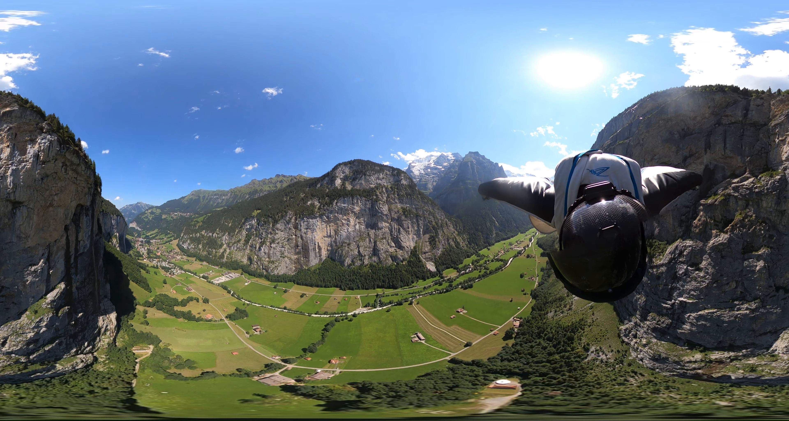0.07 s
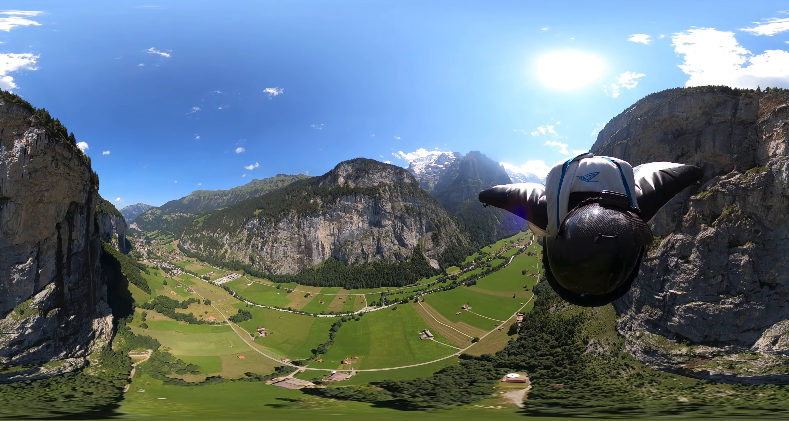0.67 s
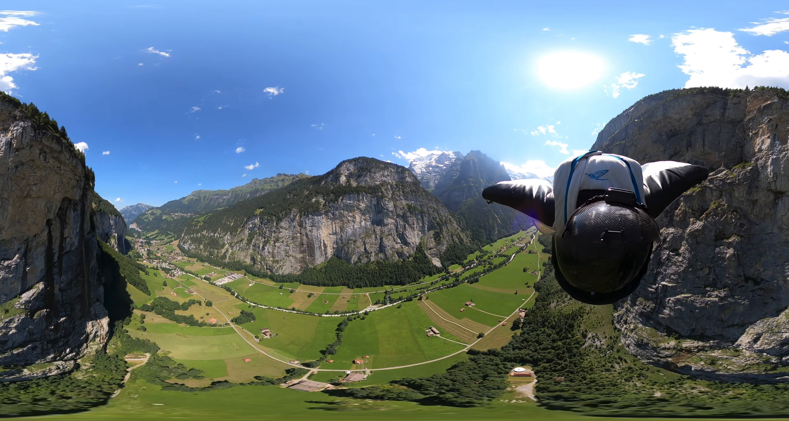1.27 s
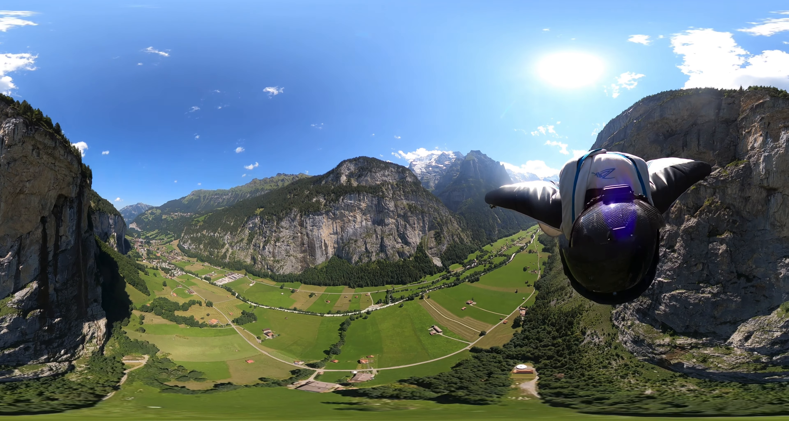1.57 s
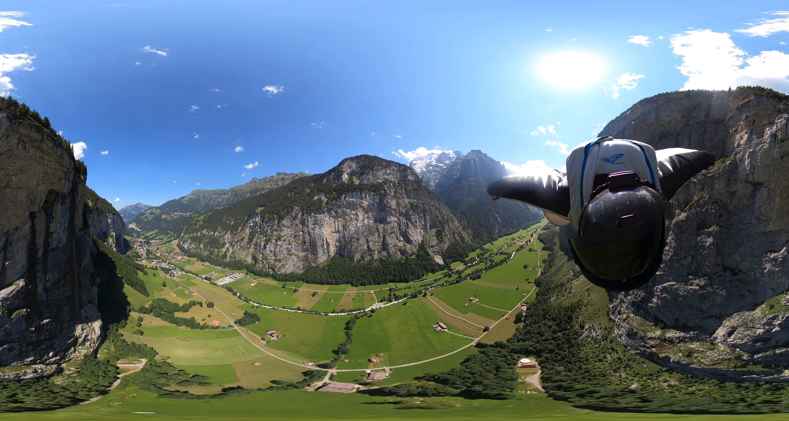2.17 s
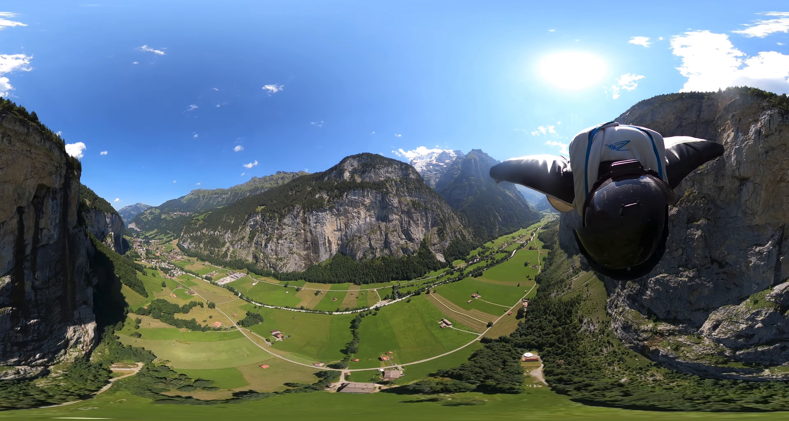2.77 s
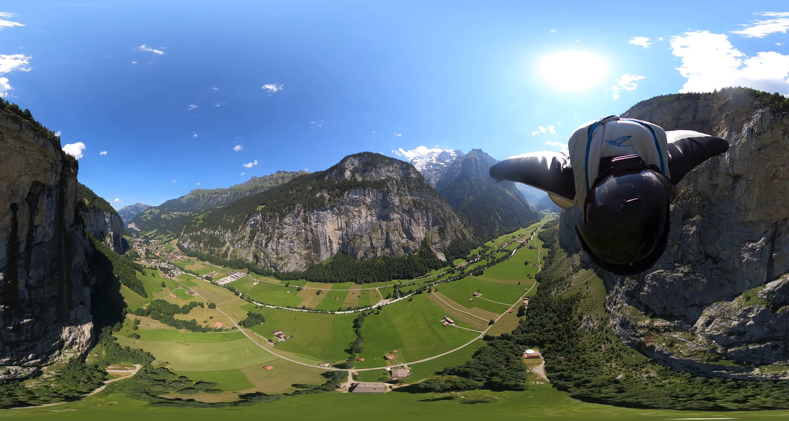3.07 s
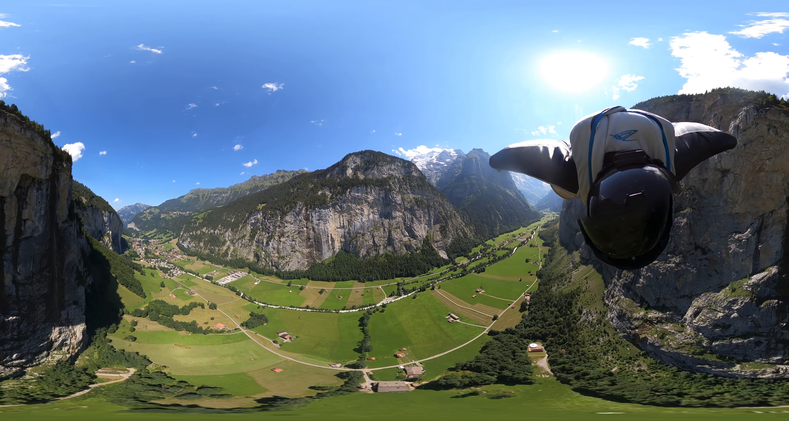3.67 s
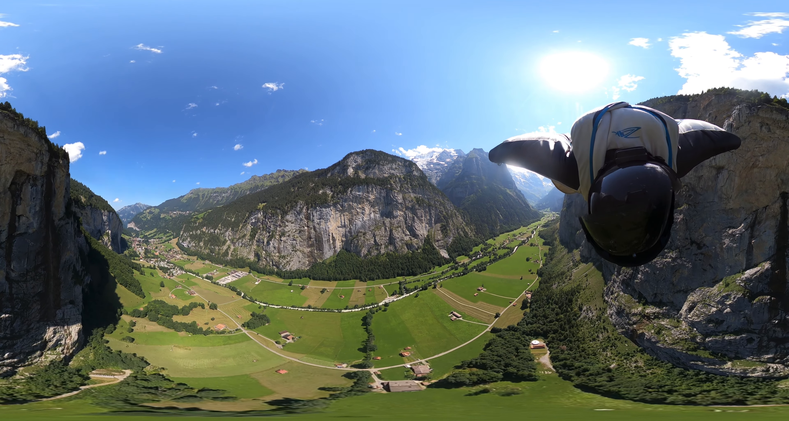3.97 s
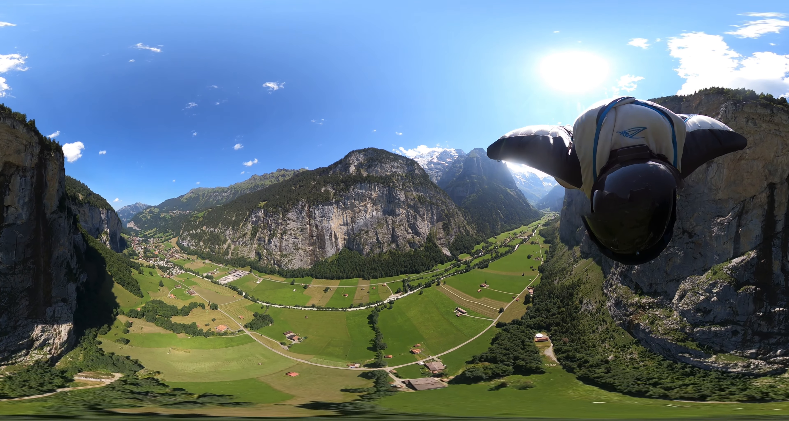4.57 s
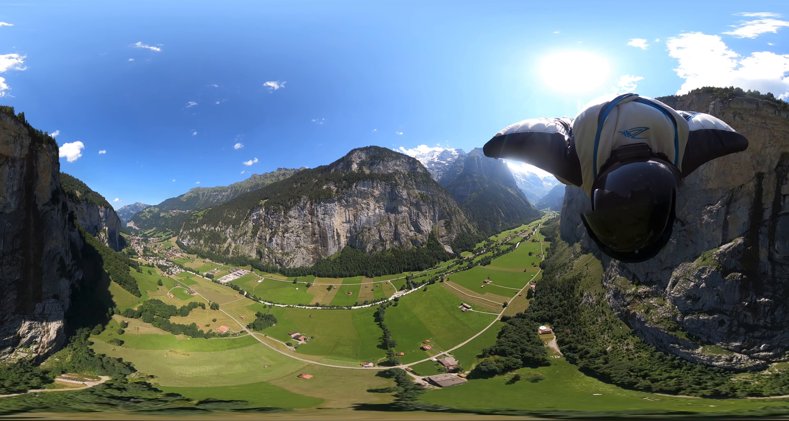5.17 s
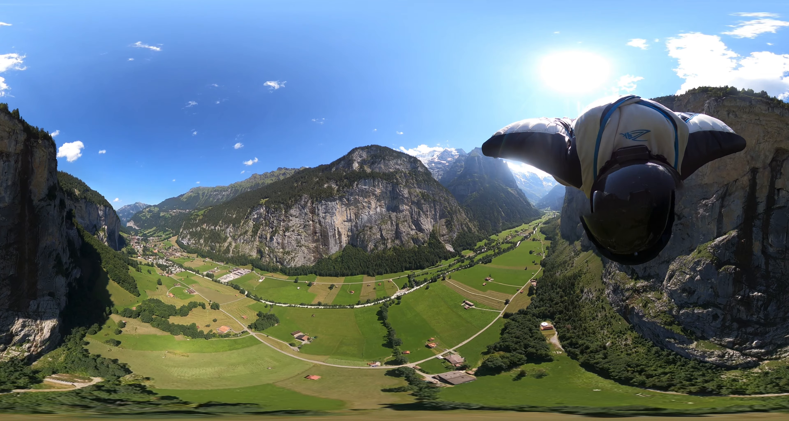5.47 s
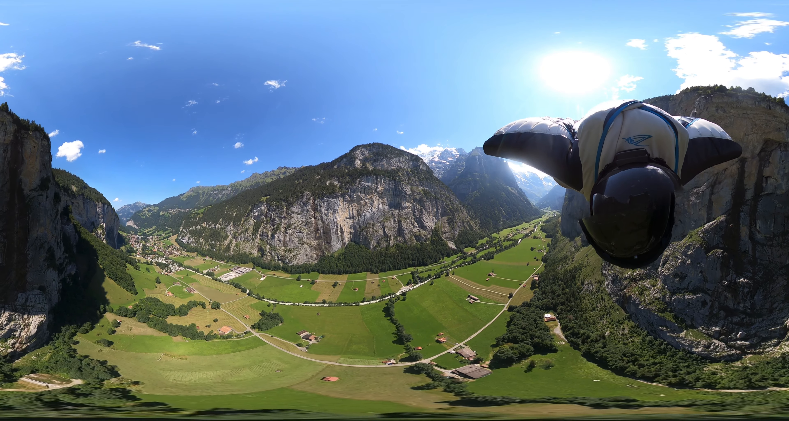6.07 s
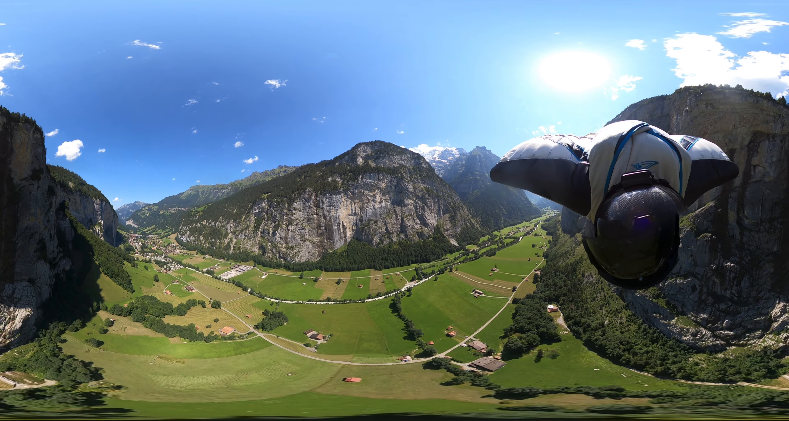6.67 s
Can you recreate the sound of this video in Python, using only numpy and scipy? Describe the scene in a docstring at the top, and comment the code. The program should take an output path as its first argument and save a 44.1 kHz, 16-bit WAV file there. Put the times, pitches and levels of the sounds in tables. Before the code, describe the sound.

Heard very close on a wingsuit flying through open air, deep, gusty buffeting hits the microphone over a steady, fluttering rush. Past the middle, the wind slowly grows as the helmet and suit resonate in the flow. Near the end the rush swells and brightens, a brief high whistle slides down with a flash of hiss, and a whoosh drops in pitch.

```python
"""A wingsuit flight along a cliff, heard close up from a camera microphone riding in the airstream.
From the start, eddies thump and roar on the microphone port while air rushes over helmet and suit.
Around four seconds in, pockets of helmet and suit begin to resonate and the wind builds.
Just past six seconds the rush surges: an edge whistles downward, a thin sizzle flares, a whoosh sinks.
The wind stays louder to the end. Throughout, the camera's limiter holds the peaks."""
import sys
import numpy as np
from scipy import signal
from scipy.fft import rfft, irfft, next_fast_len
from scipy.io import wavfile
from scipy.ndimage import uniform_filter1d, minimum_filter1d, map_coordinates

SR = 44100
rng = np.random.default_rng(int(sys.argv[2]) if len(sys.argv) > 2 else 0)


def int16_out(signal):
    """Quantize to a 16-bit WAV file."""
    q = np.round(np.clip(np.atleast_2d(signal).T, -1, 1) * 32767)
    wavfile.write(sys.argv[1], SR, q.astype(np.int16))


N = 306044

# spectra of large and small eddies right on the microphone port: frequency_hz, density_db
THUMP_SPECTRUM = [(5, -3.5), (22, -2.5), (45, 0), (72, 1), (120, -3.5), (155, -6), (230, -7), (300, -13),
                  (400, -22.5), (600, -41), (1500, -88)]
ROAR_SPECTRUM = [(150, -37.5), (310, 3.5), (420, 0), (570, -2), (800, -9), (1200, -21.5), (2500, -50),
                 (6000, -94)]
# gusts that strike the port: crest_s, length_s, thump_lift_db, roar_lift_db
PORT_GUSTS = [(0.34, 0.095, 2.5, 3), (0.903, 0.14, -2, 2), (1.08, 0.29, 1.5, 2), (1.394, 0.18, 1.5, 0),
              (1.657, 0.15, 2, 7.5), (1.864, 0.07, 2, 4), (2.166, 0.24, 1.7, 4), (2.54, 0.065, 2.5, 2.5),
              (2.727, 0.073, 3, 5), (2.936, 0.058, 4.5, 5), (3.022, 0.091, 2.5, 6), (3.367, 0.057, 1.5, 3),
              (3.87, 0.19, 2, 4), (4.26, 0.12, 3, 3.5), (4.722, 0.18, 1.5, 0), (5.222, 0.051, 3.5, 1.5),
              (5.47, 0.19, 2, -1), (5.775, 0.1, 2.5, 0.5), (6.398, 0.12, -0.5, 2), (6.51, 0.15, 1, 3)]
# brief lulls in the thumping: centre_s
THUMP_LULLS = [0.63, 1.19, 1.95, 2.39, 2.82, 3.57]
# airstream over helmet and suit, ahead of the trims in airstream(): time_s, rush_db, hiss_db
AIRSTREAM_LEVELS = [(0, -42, -59.3), (0.7, -41.7, -60.5), (1.45, -41.5, -59), (1.58, -41.5, -57.6),
                    (2.1, -42, -59.6), (2.7, -42.5, -60.5), (3.5, -43.3, -60), (4.7, -41, -57.5),
                    (5.4, -39.3, -56), (6.1, -39, -56), (6.5, -38, -55.5)]
# the airy top of the hiss: time_s, level_db
AIR_LEVELS = [(0, -72.5), (2.7, -76), (4.42, -74), (4.6, -85), (6.2, -69), (6.5, -83)]
# spectra of the airstream's three bands, low to high: frequency_hz, density_db
RUSH_SPECTRUM = [(350, -35), (700, 2.5), (1050, 1.5), (1700, -1.5), (2400, -5.5), (3200, -10), (4500, -20),
                 (7000, -40), (12000, -80)]
HISS_SPECTRUM = [(1800, -30.5), (3200, 0.5), (4300, -1), (6000, -4.5), (7300, -9), (9000, -14.5),
                 (10500, -17), (12000, -22), (13600, -37), (15600, -46)]
AIR_SPECTRUM = [(8000, -26), (10000, -6), (11500, -4), (12500, 0), (13500, -7.5), (15000, -17),
                (15600, -25)]
# resonating pockets of helmet and suit: crest_s, length_s, centre_hz, width_hz, level_db
POCKET_RESONANCES = [(4.35, 1.4, 229, 67, -27), (5.38, 1.4, 875, 150, -45), (4.9, 1.3, 4240, 1100, -56.5),
                     (6.62, 0.6, 99, 64, -17.5)]
# spectra of the late surge's dark body and bright part: frequency_hz, density_db
SURGE_BODY_SPECTRUM = [(350, -25), (650, 4.5), (950, -1), (1500, -5.5), (2200, -10), (3200, -19),
                       (5000, -27), (9000, -66)]
SURGE_BRIGHT_SPECTRUM = [(1000, -21), (2200, 2.5), (3300, 2.5), (4200, -1), (5000, -5), (6200, -7.5),
                         (7500, -13.5), (8700, -20.5), (10000, -34), (13000, -56)]
# spells of whistling from an edge: start_s, length_s, first_pitch_hz, last_pitch_hz, level_db, fade_db
EDGE_TONES = [(6.257, .046, 3540, 3920, -34, 0), (6.262, .04, 3420, 3140, -39.3, -2),
              (6.301, .038, 3790, 3870, -35.8, 0), (6.338, .066, 3830, 3720, -32.6, 5.5),
              (6.356, .03, 3720, 3500, -31.8, 2), (6.382, .056, 3320, 3030, -38.5, 1),
              (6.427, .032, 4070, 4230, -40, 0), (6.449, .062, 3390, 3240, -34, 5),
              (6.508, .05, 3330, 3220, -39, 0), (6.548, .072, 3270, 2890, -37.3, 5),
              (6.63, .07, 2820, 2700, -46, 3)]
# spectrum of the thin sizzle: frequency_hz, density_db
SIZZLE_SPECTRUM = [(10200, -60), (10700, -24), (11000, -14), (11600, -7.5), (12400, 0), (13100, -5),
                   (13700, -13.5), (14700, -14.5), (15600, -28)]

TIME_S = np.arange(N) / SR


def amp(db):
    """Decibels to gain."""
    return 10 ** (np.asarray(db) / 20)


def unit(x):
    """Scale to rms 1."""
    return x / np.sqrt(np.mean(x ** 2) + 1e-20)


def curves(rows):
    """One value per sample for each column after the time."""
    times_s, *columns = np.transpose(rows)
    return [np.interp(TIME_S, times_s, column) for column in columns]


def bump(crest_s, length_s):
    """A bell of height 1; its length spans two standard deviations."""
    return np.exp(-2 * ((TIME_S - crest_s) / length_s) ** 2)


def swell(crest_s, rise_s, held_db, extra_db, settle_s=0.37):
    """A gain that rises to a crest, then settles to a held level."""
    since_s = TIME_S - crest_s
    rising = np.exp(-(np.minimum(since_s, 0) / rise_s) ** 2)
    settling = np.exp(-np.maximum(since_s, 0) / settle_s)
    return rising * amp(held_db + extra_db * settling)


def wobble(knots_per_s):
    """A smooth curve through random knots."""
    knots = rng.standard_normal(N // 8)
    return map_coordinates(knots, [TIME_S * knots_per_s], mode="wrap")


def filtered(x, response):
    """Pass x through a response given as a function of frequency in Hz."""
    size = next_fast_len(N + 8192)
    return irfft(rfft(x, size) * response(np.fft.rfftfreq(size, 1 / SR)), size)[:N]


def turbulence(spectrum, patchy_db):
    """Wind noise of rms 1: passing eddies lift and drop patches of its spectrum."""
    cells = signal.stft(rng.standard_normal(N), nperseg=512)[2]
    patches = uniform_filter1d(rng.standard_normal(cells.shape), size=9, axis=0)  # across frequency
    patches = uniform_filter1d(patches, size=14, axis=1)  # across time
    noise = signal.istft(cells * amp(patchy_db * unit(patches)), nperseg=512)[1][:N]
    points_hz, points_db = np.transpose(spectrum)
    return unit(filtered(noise, lambda hz: amp(np.interp(np.log(hz + 1), np.log(points_hz), points_db))))


def buffeting(flutter, build_start_s=4.13, thump_db_per_s=0.7, roar_db_per_s=2.5):
    """Right on the port, large eddies thump and smaller ones roar; both gust and grow late in flight."""
    building_s = np.maximum(TIME_S - build_start_s, 0)
    lulls = sum(bump(centre_s, length_s=0.098) for centre_s in THUMP_LULLS)
    thump_db = -18.7 + thump_db_per_s * building_s - 1.5 * lulls
    roar_db = -37 + roar_db_per_s * building_s
    for crest_s, length_s, thump_lift_db, roar_lift_db in PORT_GUSTS:
        gust = bump(crest_s, length_s)
        thump_db += thump_lift_db * gust
        roar_db += roar_lift_db * gust
    thumps = amp(thump_db) * turbulence(THUMP_SPECTRUM, patchy_db=-0.07)
    roar = amp(roar_db + 0.23 * flutter) * turbulence(ROAR_SPECTRUM, patchy_db=0.5)
    return thumps + roar


def airstream(flutter, rush_trim_db=1.51, hiss_trim_db=2.5):
    """Air tears past helmet and suit, close to the microphone, trembling with the turbulence."""
    rush_db, hiss_db = curves(AIRSTREAM_LEVELS)
    air_db, = curves(AIR_LEVELS)
    rush = amp(rush_db + rush_trim_db) * turbulence(RUSH_SPECTRUM, patchy_db=0.5)
    hiss = amp(hiss_db + hiss_trim_db) * turbulence(HISS_SPECTRUM, patchy_db=1.0)
    air = amp(air_db) * turbulence(AIR_SPECTRUM, patchy_db=0.0)
    return amp(0.24 * flutter) * (rush + hiss + air)


def pockets():
    """Pockets of helmet and suit resonate broadly while the flow meets them at the right angle."""
    total = np.zeros(N)
    for crest_s, length_s, centre_hz, width_hz, level_db in POCKET_RESONANCES:
        noise = rng.standard_normal(N)
        band = filtered(noise, lambda hz: 1 / (1 + ((hz - centre_hz) / width_hz) ** 2) ** 2)
        total += amp(level_db) * bump(crest_s, length_s) * unit(band)
    return total


def surge(flutter):
    """The flow swells quickly and stays louder and brighter; a full roar gathers under the hiss."""
    bright_gain = swell(crest_s=6.27, rise_s=0.093, held_db=-40.5, extra_db=1)
    body_gain = swell(crest_s=6.4, rise_s=0.29, held_db=-37.5, extra_db=2.5)
    bright = bright_gain * turbulence(SURGE_BRIGHT_SPECTRUM, patchy_db=1.0)
    body = body_gain * turbulence(SURGE_BODY_SPECTRUM, patchy_db=2.0)
    return amp(0.25 * flutter) * bright + body


def whoosh(crest_s=6.43, length_s=0.42, crest_hz=870, fall_octaves_per_s=4.5, width_hz=850, level_db=-38):
    """A broad band of roar swells and sinks in pitch as the surge passes."""
    since_s = np.clip(TIME_S - crest_s, -length_s, length_s)
    centre_hz = crest_hz * 2 ** (-fall_octaves_per_s * since_s)
    low_noise = wobble(width_hz) + 1j * wobble(width_hz)
    band = low_noise * np.exp(2j * np.pi * np.cumsum(centre_hz) / SR)
    return amp(level_db) * bump(crest_s, length_s) * unit(band.real)


def edge_whistle(start_s, length_s, first_pitch_hz, last_pitch_hz, level_db, fade_db):
    """Vortices shed from an edge: a ragged, gliding tone whose strength and phase keep slipping."""
    flutter_hz, roughness, slips_per_s, ramp_s = 34, 0.55, 480, 0.01
    since_s = TIME_S - start_s
    progress = np.clip(since_s / length_s, 0, 1)
    glide_hz = first_pitch_hz + (last_pitch_hz - first_pitch_hz) * progress
    pitch_hz = glide_hz + flutter_hz * wobble(knots_per_s=150)
    slips = 1 + roughness * (wobble(slips_per_s) + 1j * wobble(slips_per_s))
    tone = slips * np.exp(2j * np.pi * np.cumsum(pitch_hz) / SR)
    octave = amp(-23) * unit((tone ** 2).real)
    gate = np.clip(since_s / ramp_s, 0, 1) * np.clip((length_s - since_s) / ramp_s, 0, 1)
    return gate * amp(level_db - fade_db * progress) * (unit(tone.real) + octave)


def sizzle(start_s=6.26, attack_s=0.014, fall_after_s=0.024, level_db=-39.4, fall_db_per_s=220):
    """A very high, sputtering hiss flares as the whistle starts, holds briefly and dies away."""
    since_s = TIME_S - start_s
    attack = np.clip(since_s / attack_s, 0, 1)
    fall_db = fall_db_per_s * np.maximum(since_s - fall_after_s, 0)
    sputter_db = 0.7 * wobble(knots_per_s=250)
    return attack * amp(level_db - fall_db + sputter_db) * turbulence(SIZZLE_SPECTRUM, patchy_db=2.5)


def scene():
    """The wind at the microphone, in mono; roar, airstream and surge share one fast flutter."""
    flutter = unit(wobble(knots_per_s=23) + 1.5 * wobble(knots_per_s=60))
    wind = buffeting(flutter) + airstream(flutter) + pockets() + surge(flutter) + whoosh()
    whistles = sum(edge_whistle(*spell) for spell in EDGE_TONES)
    return (wind + whistles + sizzle())[None]


def limiter(x, ceiling_db):
    """The gain ducks smoothly around every peak that would pass the ceiling."""
    needed_gain = np.minimum(1, amp(ceiling_db) / (np.abs(x) + 1e-9))
    held_gain = minimum_filter1d(needed_gain, size=400)
    return x * uniform_filter1d(held_gain, size=300)


def record(dry):
    """The camera limits the peaks, sheds the deepest pressure swings and cuts off the highest treble."""
    low_cut_hz, top_hz = 9, 15650
    limited = limiter(dry[0], ceiling_db=-8.5)
    high_passed = filtered(limited, lambda hz: 1j * hz / (1j * hz + low_cut_hz))
    return filtered(high_passed, lambda hz: hz < top_hz)[None]


dry = scene()
out = record(dry)
int16_out(out)
```